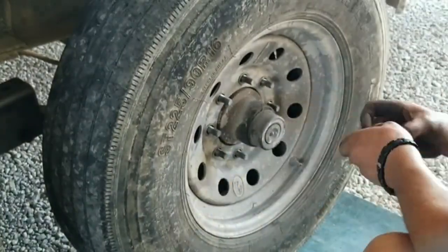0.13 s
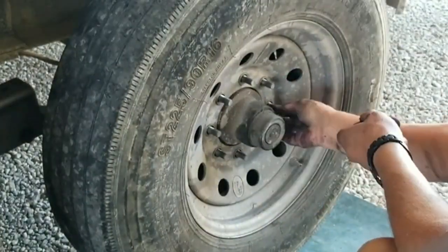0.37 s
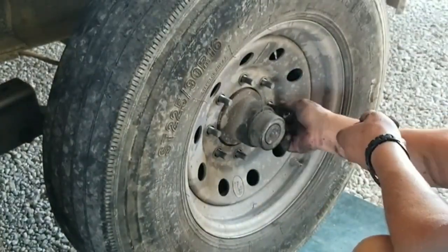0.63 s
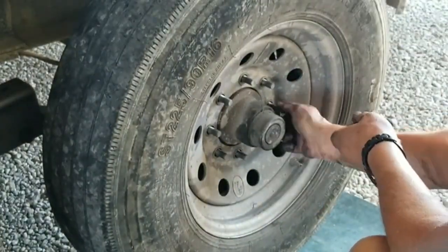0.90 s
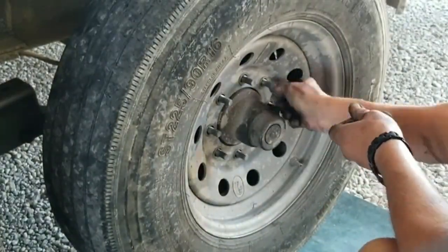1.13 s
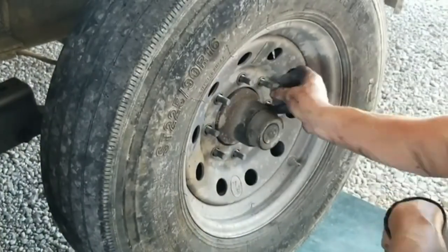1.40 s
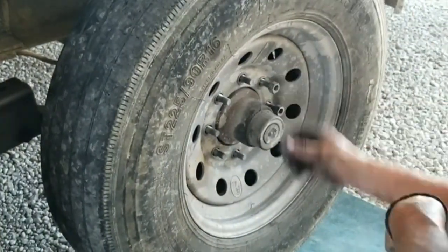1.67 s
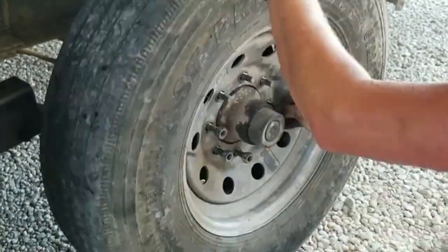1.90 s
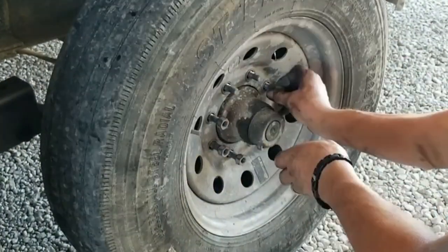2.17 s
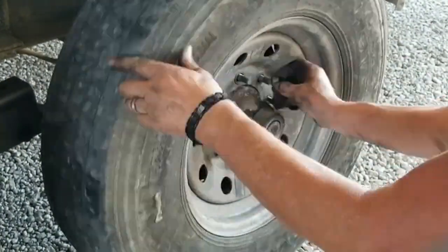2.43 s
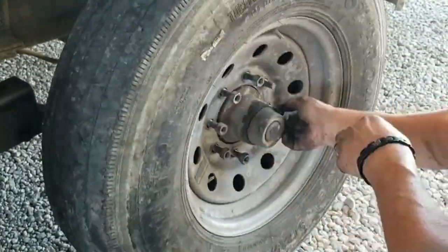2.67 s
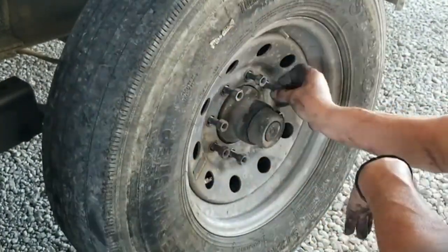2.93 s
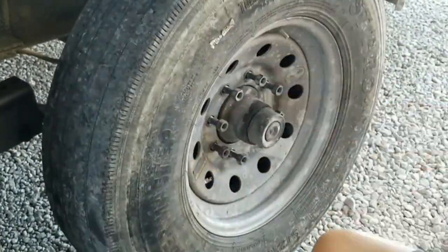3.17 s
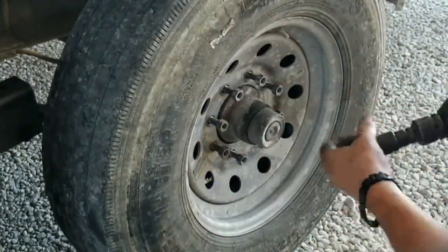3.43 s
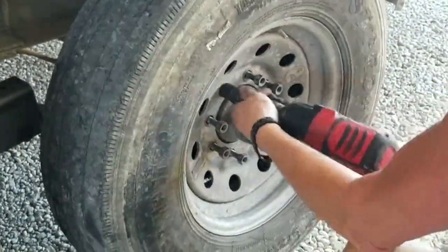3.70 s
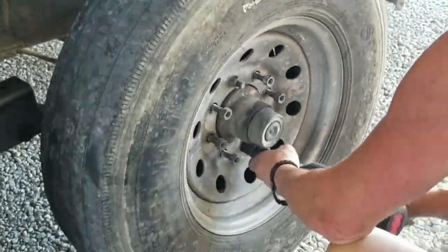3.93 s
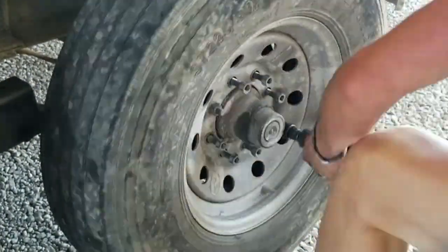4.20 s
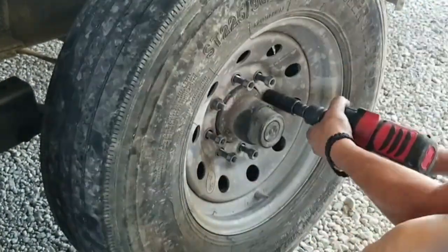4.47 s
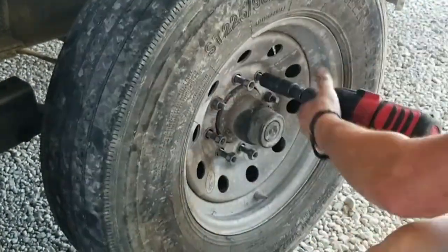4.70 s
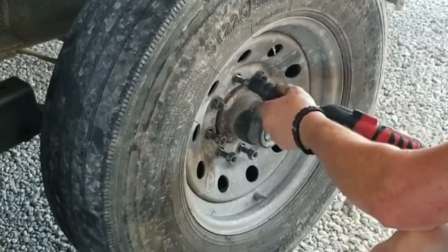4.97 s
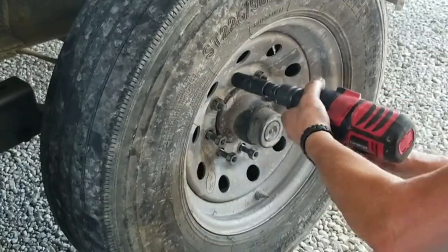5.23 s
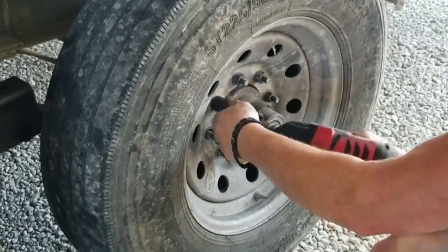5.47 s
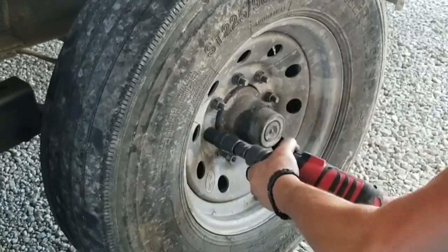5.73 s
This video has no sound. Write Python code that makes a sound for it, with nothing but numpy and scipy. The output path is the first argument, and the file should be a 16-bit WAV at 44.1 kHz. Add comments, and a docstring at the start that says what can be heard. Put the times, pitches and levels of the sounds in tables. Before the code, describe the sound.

A close stereo microphone outdoors picks up a faint, flickering machine hiss with thin, wavering hum and a low throbbing drone, strongest around 2 to 3 s. Wind flutters over the microphone as short, dull pops and soft turbulent rumble, frequent in the first second, strong near 1.45 s, and loudest from 2.8 to 3.3 s, first leaning left. At about 1.2 s two nuts knock together with a tiny bright double click; light scrapes follow near 1.5 and 1.95 s. A sharp, gritty clink on the steel wheel comes at 3.2 s. From 3.6 s an impact wrench works in short bursts: a quick rattling spin, then fast, hard, noisy hammering with high metallic ringing, around 3.7, 3.95, 4.3, 4.55, 4.85, 5.2, 5.4 and 5.8 s. Each hammering makes the hiss duck, then creep back, while wind pops grow weaker.

```python
"""From the start a machine hiss (flickering noise bands) and thin hum lines (wandering sines) run on, while
wind thumps on two microphone ports as short pops over turbulent noise. Near 1.2 s nuts knock together as ringing
modes, and nuts clink on a steel wheel rung by scrapes of noise. From 3.6 s an impact wrench works in short bursts,
its noisy blows ringing anvil, socket and body. Hiss, upper hum and calm wind sink during each hammering,
then creep back."""
import sys
import numpy as np
from scipy import signal
from scipy.fft import rfft, irfft
from scipy.io import wavfile
from scipy.ndimage import uniform_filter1d

SR = 44100
rng = np.random.default_rng(int(sys.argv[2]) if len(sys.argv) > 2 else 0)


def to_linear_factor(level_db):
    """Convert decibel levels (scalar or array-like) to linear amplitude factors."""
    exponent = np.asarray(level_db, float) / 20
    return 10 ** exponent


def bounce(signal):
    """Save signal as a 16-bit WAV file at the path given by the first command-line argument."""
    frames = np.transpose(np.atleast_2d(signal))
    limited = np.clip(frames, -1, 1)
    pcm = np.round(limited * 32767).astype(np.int16)
    wavfile.write(sys.argv[1], SR, pcm)


N = 258282
T = np.arange(N) / SR  # time in s
F = np.fft.rfftfreq(N, 1 / SR)  # bin frequency in Hz

# Throughout, pan_db is left minus right, and spectrum levels are relative.
# Hiss spectrum: frequency_hz, density_db (per Hz)
HISS_SPECTRUM = [(150, -33), (250, -19), (406, -11.5), (555, -3), (616, -3.5), (1110, -3.5), (1300, -2.5),
                 (2110, 0), (2300, -4.5), (2660, -4), (3050, -6.5), (3470, -3.5), (3790, 0.5), (4650, -5),
                 (5330, -1), (6000, -5.5), (6430, -3.5), (6880, -1.5), (7360, -7), (8200, -6),
                 (15800, -13.5)]
# Course of the hiss before any dip; hiss() plays it 5 dB higher: time_s, level_db
HISS_LEVEL = [(0.0, -51.5), (0.2, -53.5), (0.4, -52.5), (1.05, -52.5), (1.25, -51), (1.75, -50.5),
              (1.87, -49), (2.1, -49.5), (2.5, -51.5), (2.95, -51.5), (3.1, -55), (3.65, -55), (4.5, -60),
              (5.0, -58.5), (5.2, -59), (5.5, -57), (5.73, -56), (5.86, -50.5)]
# Share of hiss power common to both ports: frequency_hz, share (0 to 1)
HISS_LIKENESS = [(300, 0.08), (640, 0.64), (1400, 1), (3100, 1), (6800, 0.93), (15000, 0.51)]
PORT_LAG_S = 3.2e-5  # hiss and hum reach the right port later
DIP_DB, CREEP_DB_PER_S = -12, 38.5  # sinking during hammering, then the climb back

# Upper hum partials: pitch_hz
PARTIAL_HZ = [1199, 2187, 2399, 6664]
# One row per upper partial: level_db (over the hiss, before the shared fade), wander_hz, waver_db
PARTIALS = [(-16, 3.14, 3), (-9.5, 6, 3.5), (-16.5, 3.04, 3), (-3.5, 5.3, 1.5)]
# Shared fade of the upper partials: time_s, gain_db
PARTIAL_FADE = [(0, 0), (1.5, 2.5), (2.3, 0.5), (2.6, -6.5), (3.5, 2.5), (3.9, 2.5), (4.4, 1), (4.75, 5.5),
                (4.9, 5), (5.0, 3), (5.15, 4), (5.4, 1), (5.7, 4), (5.86, -3)]
DRONE_HZ, THROB_HZ = 547, 22
# Swelling of the drone, before throb and waver: time_s, rms_db
DRONE_LEVEL = [(0.0, -61), (0.2, -70), (0.45, -64), (0.5, -64), (0.62, -58), (0.65, -83), (0.85, -67),
               (0.9, -62), (0.94, -77), (1.13, -68), (1.17, -59.5), (1.24, -58.5), (1.34, -63),
               (1.42, -67.5), (1.52, -58.5), (1.62, -66.5), (1.75, -62), (1.89, -60.5), (1.94, -67),
               (1.97, -53), (2.07, -54.5), (2.12, -59), (2.15, -57), (2.22, -60), (2.27, -54.5),
               (2.34, -60), (2.4, -56), (2.45, -62), (2.58, -56.5), (2.74, -65.5), (2.93, -56),
               (3.05, -58.5), (3.18, -61.5), (3.35, -74), (3.38, -64), (3.66, -61), (3.71, -72.5),
               (4.46, -81.5), (5.16, -75), (5.56, -81), (5.62, -66), (5.64, -67), (5.668, -56), (5.69, -68),
               (5.77, -83), (5.86, -66)]
OCTAVE_DB, OCTAVE_FOLLOWS = -1.5, 0.57  # over the hiss; dB for each dB of drone over the hiss
# Tones that come and go: start_s, end_s, pitch_hz, level_db (peak, before waver)
PASSING_TONES = [(1.306, 1.37, 920, -53), (1.945, 2.01, 935, -49), (2.0, 2.1, 935, -50.5),
                 (2.067, 2.2, 929, -57), (5.123, 5.21, 1216, -64), (5.22, 5.277, 1416, -61),
                 (5.675, 5.775, 1088, -57)]

# Eddy spectrum: frequency_hz, density_db (per Hz)
EDDY_SPECTRUM = [(100, -41), (200, -27.5), (400, -3), (750, -3.5), (1300, -8), (2000, -9), (5000, -29.5)]
# Rumble spectrum: frequency_hz, density_db (per Hz)
RUMBLE_SPECTRUM = [(20, 1.5), (60, -3), (150, -1), (300, -2), (600, -74)]
# Depth of the wind: time_s, rumble_db (over the eddies, before their flicker)
WIND_DEPTH = [(0.0, -9), (0.6, -11.5), (1.5, -6.5), (2.2, -6.5), (2.7, -13), (2.85, -24), (3.1, -30),
              (3.22, -5), (3.34, -5.5), (3.5, -13.5), (4.1, -11.5), (5.86, -15)]
# Longer stirrings of wind: centre_s, level_db, half_length_s (power down to 1/e), pan_db
STIRS = [(0.024, -46.5, 0.039, 0), (0.347, -53.5, 0.085, 2.5), (0.664, -53.5, 0.01, 6),
         (0.777, -57, 0.053, -4), (1.015, -60.5, 0.038, -4), (1.696, -60, 0.011, 9), (1.847, -59, 0.075, 9),
         (2.512, -70, .07, -5), (2.724, -56, 0.21, -3), (3.045, -50, 0.063, 0.5), (3.84, -63, 0.058, -8),
         (4.214, -65.5, 0.13, -5.5), (4.503, -74, 0.24, -11), (5.076, -62, 0.037, -1),
         (5.585, -61, 0.022, -7), (5.797, -60, 0.079, -2)]
# Wind thumps: centre_s, level_db (pop peak is 3.5 dB lower), pitch_hz, pan_db, length_ms (at least 0.7 is used)
THUMPS = [(0.017, -35, 1020, -3, 1.3), (0.024, -38, 940, 1, 2.1), (0.032, -30, 866, -17, 1.4),
          (0.039, -32, 830, -14, 2.1), (0.055, -39, 885, 15, 3.5), (0.188, -31, 910, 2, 1.55),
          (0.278, -34, 676, 3, 1.8), (0.289, -40, 816, -1, 1.8), (0.315, -35, 1350, -4, 1.4),
          (0.348, -40, 880, 2, 1.8), (0.352, -35.5, 726, 5, 1.7), (0.369, -36, 690, -6, 2),
          (0.374, -33, 680, 1, 0.62), (0.383, -34, 790, 0, 1.1), (0.39, -30.5, 1080, -9, 0.92),
          (0.403, -32, 925, -1, 1.7), (0.466, -39, 840, -1, 2.2), (0.623, -44, 1040, 5, 0.92),
          (0.653, -36, 1030, -3, 0.91), (0.658, -34, 1080, 3, 0.67), (0.68, -38, 750, 5, 1.4),
          (0.747, -35.5, 770, -4, 1.3), (0.763, -39, 1030, -5, 1.1), (0.769, -35, 660, 2, 2),
          (0.78, -34.5, 940, 0, 1.2), (0.798, -43, 940, 1, 3), (0.818, -37.5, 786, 5, 1.7),
          (0.955, -39, 940, 1, 2), (0.961, -35, 533, -1, 3.8), (1.014, -38, 740, -3, 1.9),
          (1.035, -33, 860, -3, 1.9), (1.043, -34, 720, 1, 1.6), (1.329, -42, 1000, 1, 2.3),
          (1.442, -28.5, 850, -3, 1.6), (1.447, -25.5, 695, 1, 1.06), (1.455, -36, 1020, 3, 0.9),
          (1.473, -38, 1560, 3, 3.7), (1.673, -40, 1040, 4, 1.8), (1.677, -30.5, 820, 1, 1.2),
          (1.685, -34, 1140, 0, 0.56), (1.766, -32.5, 1090, 6, 1.1), (1.793, -32, 910, 1, 1.5),
          (1.806, -36, 1000, 12, 1.3), (1.811, -29.5, 950, 9, 2.2), (1.98, -48, 870, -1, 1.1),
          (2.029, -43, 1100, -9, 1.6), (2.055, -37, 1250, 1, 2), (2.185, -32, 920, 0, 0.95),
          (2.535, -33, 825, -2, 1.2), (2.54, -38, 940, -4, 0.8), (2.631, -46, 930, 4, 0.99),
          (2.642, -29, 755, -3, 1.5), (2.655, -40, 960, 2, 1.1), (2.801, -33, 640, 16, 1.3),
          (2.815, -42, 840, 13, 2.3), (2.83, -24.5, 1030, 28, 0.5), (2.834, -23.5, 830, 30, 1.3),
          (2.889, -32, 710, 14, 2), (2.927, -28.5, 790, 23, 1.3), (2.933, -31, 1040, 14, 1.3),
          (3.0, -31, 825, 21, 3.3), (3.008, -33, 830, 15, 2.1), (3.012, -36, 840, 14, 1.2),
          (3.03, -24, 1120, 24, 1.07), (3.046, -33, 930, 15, 1.3), (3.136, -26.5, 760, 9, 1.3),
          (3.141, -28, 755, -3.5, 0.48), (3.146, -21, 745, -11.5, 2.2), (3.152, -27, 1160, -2, 0.96),
          (3.249, -20.5, 730, -11, 1), (3.256, -23, 634, -9, 3.5), (3.262, -26, 1080, -7, 0.88),
          (3.271, -34, 840, 0, 1.2), (3.288, -38, 1000, -6, 2.1), (3.303, -33, 790, -9, 1.6),
          (3.308, -34, 740, 8, 1.4), (3.312, -33, 755, -12, 2.3), (3.317, -30, 850, -3.5, 1.3),
          (3.323, -36, 800, -6, 1.3), (3.557, -42, 1190, 1, 1.2), (3.665, -38.5, 790, -6, 1.1),
          (3.69, -44, 1170, 4, 1.4), (3.708, -39, 1130, -1, 1.2), (3.852, -35, 890, -6, 0.75),
          (3.857, -48, 890, -2, 0.9), (3.866, -41.5, 780, 6, 0.87), (3.923, -48, 1230, 2, 2.4),
          (4.005, -57, 1130, 3, 1.5), (4.011, -58, 830, 3, 1.7), (4.03, -48, 1120, 3, 1.5),
          (4.116, -44.5, 760, -4, 2), (4.154, -51, 860, -3, 1.5), (4.181, -53, 910, 0, 0.97),
          (4.237, -42, 920, -10, 1), (4.246, -46, 810, -3, 1.1), (4.264, -48, 770, -1, 2.1),
          (4.313, -51, 1120, 3, 1.0), (4.329, -49, 970, 3, 1.0), (4.38, -53, 785, -7, 2),
          (4.423, -51, 610, -9, 1.6), (4.464, -44, 880, -13, 0.81), (4.476, -43.5, 1200, -4, 0.89),
          (4.495, -50, 1120, -8, 2.1), (4.501, -45, 910, 1, 0.67), (4.511, -44, 730, -3, 1.2),
          (4.526, -50, 800, -4, 1.4), (4.541, -44, 615, -6, 2.6), (4.548, -46, 850, 3, 1.4),
          (4.601, -56, 890, 1, 1.8), (4.801, -46, 940, -14, 1.3), (4.811, -46, 1150, -1, 1.5),
          (4.819, -54, 973, -1, 1.6), (4.827, -39.5, 600, -1, 1.6), (4.877, -46, 1120, -2, 0.82),
          (5.033, -41.5, 825, -2, 1.5), (5.04, -44, 1090, -16, 1.8), (5.052, -43.5, 825, -4, 2.0),
          (5.256, -52, 1400, -5, 6.0), (5.291, -42, 760, 3, 0.73), (5.33, -44, 1130, -3, 0.72),
          (5.387, -46, 780, -7, 0.71), (5.399, -52, 1190, -4, 1.0), (5.408, -50, 1150, -5, 1.0),
          (5.419, -45, 930, 2, 1.2), (5.428, -40, 1070, 1, 0.62), (5.433, -51, 1040, 1, 0.9),
          (5.447, -43.5, 1110, -4, 1.1), (5.452, -48, 1050, 0, 0.75), (5.575, -43, 1000, -3, 0.61),
          (5.678, -57, 1060, -1, 1.4), (5.711, -54, 1090, -3, 1.2), (5.716, -44, 1060, -6, 1.7),
          (5.757, -41, 1130, -7, 1), (5.762, -42, 1190, -9, 1.6), (5.821, -45, 1030, -4, 1.6)]
CALM_DB, GUST_PAN = -73, 0.76  # wind between thumps; dB of eddy pan for each dB of gust pan
GUST_DB, GUST_TOP_DB = -23, -50  # relative to a thump's level_db; loudest a gust gets
GATHER_S, DIE_S = 0.013, 0.01  # time constants of a gust before and after its thump
THUMP_SKEW_RAD = 1.293  # spread of the phase between the ports
SHED_DB, SHED_SPREAD_S, SHED_OCTAVES = -9.5, 0.006, 0.73  # smaller pops around each thump

# Clinks, mostly nuts against the wheel; the 1.215 s row trails the knock of the nuts in the hand: centre_s,
# peak_db (before panning), low_hz, high_hz, length_ms
CLINKS = [(1.215, -35, 3300, 5900, 16), (1.471, -37, 1410, 2600, 5), (1.95, -39.5, 4000, 13000, 3.3),
          (3.198, -39, 3500, 14000, 7), (3.208, -29, 3300, 7600, 7.3), (3.209, -34, 7600, 14400, 12),
          (3.216, -28, 2800, 7400, 7.2), (3.215, -32, 1400, 2880, 8), (3.56, -41, 7000, 14900, 3.5),
          (3.797, -50, 7000, 12000, 1.13), (4.434, -39.5, 4500, 15000, 1.4), (5.35, -48, 4500, 10900, 5.1)]
# Wheel modes: frequency_hz, level_db, t60_s
WHEEL_MODES = [(2060, 9, 0.022), (3480, -11.5, 0.04), (4390, 2, 0.018), (4810, 2, 0.015)]
# Nut modes: frequency_hz, level_db, t60_s
NUT_MODES = [(3560, 0, .014), (3700, -1, .02), (4180, -4, .016), (4700, -3, .008), (5300, -2, .006),
             (5900, -6, .005)]
# Two nuts knocking together in the hand: start_s, peak_db (before panning)
NUT_TICKS = [(1.2088, -28), (1.2094, -20), (1.2155, -36), (1.2192, -33)]
CLINK_PAN_DB = -4

# Anvil modes: frequency_hz, level_db, t60_s
ANVIL_MODES = [(6312, -3, .025), (6444, -6, .025), (6660, 0, .03), (6765, -6, .025), (7020, -6, .02),
               (7130, -10, .02)]
# Socket modes: frequency_hz, level_db (before the focus weighting), t60_s
SOCKET_MODES = [(9500, -3, .03), (9621, -2, .035), (9700, 0, .035), (9760, -2, .035), (9893, -2, .03)]
# Wrench body modes: frequency_hz, level_db, t60_s
BODY_MODES = [(3600, -15, 0.0053), (4460, 5, 0.015), (5380, 11, 0.01)]
# Socket modes that ring most, nut by nut: time_s, centre_hz
SOCKET_FOCUS = [(3.6, 9484), (4.0, 9630), (4.3, 9726), (4.6, 9810), (4.85, 9794), (5.25, 9800), (5.8, 9690)]
FOCUS_WIDTH_HZ = 66
# Clatter spectrum: frequency_hz, density_db (per Hz)
CLATTER_SPECTRUM = [(300, -29), (900, -7), (2000, 2), (4000, 10.5), (8000, 15), (11000, 12), (13500, 13.5),
                    (15300, 17.5), (16000, -22)]
# Running a nut down: start_s, end_s, clatter_start_db, clatter_end_db, socket_db (over the clatter)
RUNDOWNS = [(3.598, 3.695, -51, -54.5, -3), (3.849, 3.926, -55, -60, -11), (4.429, 4.511, -59, -61, -8),
            (4.728, 4.799, -65, -55, -0.5), (5.107, 5.169, -53.5, -54.5, -22),
            (5.67, 5.742, -53.5, -48, -17)]
RUN_ANVIL_DB, RUN_BODY_DB, RUN_PAN_DB = -29, -9, -2  # rings over the clatter; pan
# Hammering a nut tight, before surges: start_s, end_s, clatter_db, anvil_db, socket_db (rings over the clatter)
HAMMERING = [(3.694, 3.703, -49.5, -3, -3.5), (3.943, 4.037, -48.5, 3.5, 0), (4.264, 4.327, -48.5, -6, -2),
             (4.524, 4.618, -52, -9, 1.5), (4.816, 4.88, -49.5, -7, -2), (5.177, 5.276, -55, -8.5, -10.5),
             (5.383, 5.438, -47.5, -5, -4.5), (5.756, 5.849, -47.5, -9, -11)]
HAMMER_BODY_DB, BODY_FOLLOWS = -6.5, 0.98  # over the clatter; dB of body for each dB of socket_db
HAMMER_PAN_DB, PAN_DB_PER_S = -2, -26
ATTACK_DB_PER_S, RELEASE_DB_PER_S = 2500, 1406
# Harder spells of blows: centre_s, clatter_gain_db, half_length_s (gain in dB down to 1/e)
SURGES = [(3.71, 12.5, 0.0072), (3.98, 2.5, 0.012), (4.021, 3.5, 0.03), (4.267, 3, 0.0063),
          (4.337, 10, 0.0064), (4.537, 0, 0.008), (4.58, 4, 0.013), (4.608, 2.5, 0.011),
          (4.845, 3.5, 0.008), (4.864, 3, 0.006), (4.878, 2, 0.005), (5.251, 10.5, 0.056),
          (5.42, 7.5, 0.01), (5.793, 4.5, 0.015), (5.824, 7.5, 0.027)]
RING_SURGE = 1.54  # dB gained by the rings for each dB of clatter
# Hardest single blows: time_s, level_db (over an ordinary blow)
HARD_BLOWS = [(3.698, 2), (3.705, 9), (3.944, 1), (3.964, -2), (3.966, 10.5), (3.973, -3), (3.973, 0),
              (3.986, 3), (4.007, 0), (4.028, -6), (4.032, -6), (4.266, 3), (4.268, -7), (4.321, 6),
              (4.526, -3), (4.533, -1), (4.543, 0), (4.575, 2), (4.611, 6), (5.249, 2), (5.253, 4),
              (5.259, 4), (5.406, 9), (5.4184, 4.5), (5.4235, -3), (5.4256, 5), (5.776, 4), (5.8, 2),
              (5.808, 4), (5.8265, 2), (5.8334, 8), (5.84, 7)]
MIC_HISS_DB = -71.5


def unit(x):
    """Normalization: scale to rms 1."""
    return x / np.sqrt(np.mean(x ** 2))


def course(points):
    """Linear interpolation of a (time, value) table at every sample."""
    return np.interp(T, *np.transpose(points))


def over_hz(points):
    """Interpolation of a (frequency, value) table at every bin, straight on a log axis."""
    hz, value = np.transpose(points)
    return np.interp(np.log(F + 1), np.log(hz), value)


def colour(x, points):
    """Spectral shaping: weight the bins of x by a table in dB, then scale to rms 1."""
    return unit(irfft(rfft(x) * to_linear_factor(over_hz(points)), N))


def walk(rate):
    """Slow random modulation: levels held 1 / rate s, smoothed twice, spread 1."""
    k = int(SR / rate)
    held = np.repeat(rng.standard_normal(N // k + 1), k)
    return unit(uniform_filter1d(uniform_filter1d(held, k), k)[:N])


def ring(x, modes):
    """Modal resonance: x excites a sum of exponentially decaying sines."""
    out = 0
    for hz, db, t60 in modes:
        pole = np.exp(2j * np.pi * hz / SR - np.log(1000) / (t60 * SR))
        out = out + to_linear_factor(db) * signal.lfilter([1], [1, -pole], x).imag
    return out


def pan(x, db):
    """Interaural-style level difference: left minus right in dB, split evenly over the ports."""
    return x * to_linear_factor(np.array([db, -db]) / 2).reshape(2, -1)


def add(out, s, sound):
    """Superposition: mix a short stereo sound in at time s."""
    i = max(int(s * SR), 0)
    out[:, i:i + sound.shape[1]] += sound[:, :N - i]


def dip():
    """Gain reduction in dB: a ramp down through each hammering, a slow climb after it; the deepest dip holds."""
    dips = []
    for start, end, *_ in HAMMERING:
        sinking = DIP_DB * np.clip((T - start) / (end - start), 0, 1)
        creeping = np.minimum(DIP_DB + CREEP_DB_PER_S * (T - end), 0)
        dips.append(np.where(T < end, sinking, creeping))
    return np.min(dips, axis=0)


def hiss(level_db):
    """Partial coherence with arrival delay: two ports share some noise, and its half-octaves flicker separately."""
    common, left, right = (rfft(rng.standard_normal(N)) for _ in range(3))
    share = np.clip(over_hz(HISS_LIKENESS), 0, 1)
    delay = np.exp(-2j * np.pi * F * PORT_LAG_S)
    shared = np.sqrt(share) * common * np.array([delay ** 0, delay])
    spectrum = (shared + np.sqrt(1 - share) * np.array([left, right])) * to_linear_factor(over_hz(HISS_SPECTRUM))
    edges_hz = 125 * 2 ** np.arange(0, 7.5, .5)
    out = 0
    for low, high in zip(edges_hz, edges_hz[1:]):
        flicker = to_linear_factor(0.042 * walk(3.7) + walk(27.87))
        out = out + flicker * irfft(spectrum * ((F >= low) & (F < high)), N)
    return unit(out) * to_linear_factor(level_db + 5) * to_linear_factor(0.6 * walk(40))


def line(hz, wander_hz, waver_db):
    """Frequency and amplitude modulation of a sine, with a phase lag at the right port."""
    phase = 2 * np.pi * np.cumsum(hz + wander_hz * walk(30)) / SR
    lag = np.array([[0], [2 * np.pi * hz * PORT_LAG_S]])
    return to_linear_factor(waver_db * walk(32.09)) * np.sin(phase - lag)


def hum(drone_db, hiss_db):
    """Additive synthesis: a throbbing drone, its octave, partials riding with the hiss and passing tones.
    drone_db is over the hiss."""
    throb = 1 + 0.7 * np.sin(2 * np.pi * np.cumsum(THROB_HZ + 8 * walk(9.6)) / SR)
    drone = np.sqrt(2) * to_linear_factor(drone_db) * throb * line(DRONE_HZ, 3, 1)
    octave_db = OCTAVE_DB + OCTAVE_FOLLOWS * drone_db + 1.5 * walk(30)
    octave = to_linear_factor(octave_db) * line(2 * DRONE_HZ, 6, 2)
    upper = 0
    for hz, (db, wander_hz, waver_db) in zip(PARTIAL_HZ, PARTIALS):
        upper = upper + to_linear_factor(db) * line(hz, wander_hz, waver_db)
    upper = upper * to_linear_factor(course(PARTIAL_FADE))
    passing = 0
    for start, end, hz, db in PASSING_TONES:
        fade = np.clip(np.minimum(T - start, end - T) / 0.025, 0, 1)
        passing = passing + fade * to_linear_factor(db) * to_linear_factor(3 * walk(70)) * line(hz, 16, 2)
    return to_linear_factor(hiss_db) * (drone + octave + upper) + passing


def breeze(dip_db):
    """Turbulent pressure, independent at each port: quick eddies over a deeper rumble, with gusts adding in power."""
    power = to_linear_factor(2 * (CALM_DB + dip_db + 4 * np.clip(walk(14), -2, 1.5)))
    lean = 0  # pan weighted by power
    for s, db, _, pan_db, _ in THUMPS:
        shape = np.exp(-2 * np.where(T < s, (s - T) / GATHER_S, (T - s) / DIE_S))
        gust = to_linear_factor(2 * min(db + GUST_DB, GUST_TOP_DB)) * shape
        power, lean = power + gust, lean + pan_db * gust
    for s, db, half, pan_db in STIRS:
        gust = to_linear_factor(2 * db) * np.exp(-((T - s) / half) ** 2)
        power, lean = power + gust, lean + pan_db * gust
    pan_db, deep_db = GUST_PAN * lean / power, course(WIND_DEPTH)
    eddies, deep = [], []
    for _ in range(2):
        flicker_db = np.minimum(6.2 * walk(60) + 5.9 * walk(170), 9.5)
        eddies.append(colour(rng.standard_normal(N), EDDY_SPECTRUM) * to_linear_factor(flicker_db))
    for _ in range(2):
        rumble_db = deep_db + walk(8) + 0.48 * walk(40)
        deep.append(colour(rng.standard_normal(N), RUMBLE_SPECTRUM) * to_linear_factor(rumble_db))
    return np.sqrt(power) * (pan(np.array(eddies), pan_db) + pan(np.array(deep), 0.13 * pan_db))


def burst(t, hz, ms, phase):
    """Gaussian tone burst: a sine under a bell whose width at half height is ms, at least 0.7."""
    return np.cos(2 * np.pi * hz * t + phase) * np.exp(-4 * np.log(2) * (1000 * t / max(ms, .7)) ** 2)


def thumps():
    """Vortex bursting: each eddy is a short pop, out of step between ports, shedding smaller pops around it."""
    out, t = np.zeros((2, N)), (np.arange(1024) - 512) / SR
    chances = np.clip(rng.standard_normal((len(THUMPS), 34)), -2, 2)
    for (s, db, hz, pan_db, ms), chance in zip(THUMPS, chances):
        skew = THUMP_SKEW_RAD / 2 * chance[1] * np.array([[1], [-1]])
        pop = pan(burst(t, hz, ms, np.pi * chance[0] + skew), pan_db)
        # four shed pops on each port
        when, pitch, size, turn = chance[2:].reshape(4, 4, 2, 1)
        late = np.clip(SHED_SPREAD_S * (when + .5), -.009, .009)
        shed_hz = hz * 2 ** (SHED_OCTAVES * (pitch + .5))
        shed = to_linear_factor(SHED_DB + 3.4 * size) * burst(t - late, shed_hz, 0.98, np.pi * turn)
        peak = np.abs(signal.hilbert(pop.mean(axis=0))).max()
        add(out, s + t[0], (pop + pan(shed.sum(axis=0), pan_db)) / peak * to_linear_factor(db - 3.5))
    return signal.lfilter(*signal.butter(2, 170, "high", fs=SR), out)


def nut_ticks():
    """Impulse excitation: a hard, brief contact rings the modes of the nuts."""
    out, contact = np.zeros((2, N)), np.pad(np.hanning(5), (0, 1500))
    band = signal.butter(3, [3100, 6200], "band", fs=SR)
    tick = signal.lfilter(*band, ring(contact, NUT_MODES))
    for s, db in NUT_TICKS:
        add(out, s, pan(tick / np.abs(tick).max() * to_linear_factor(db), CLINK_PAN_DB))
    return out


def swell(t, ms):
    """Contact envelope: a rounded rise and fall."""
    x = t / (max(ms, .3) / 1000)
    return x ** 1.04 * np.exp(-x ** 2)


def clinks():
    """Friction excitation: a short scrape of band-limited noise rings the wheel."""
    out, t = np.zeros((2, N)), np.arange(2048) / SR
    for s, db, low_hz, high_hz, ms in CLINKS:
        scrape = rng.standard_normal(len(t)) * swell(t, ms)
        band = signal.butter(3, [low_hz, high_hz], "band", fs=SR)
        sound = signal.lfilter(*band, scrape + 0.026 * ring(scrape, WHEEL_MODES))
        add(out, s - ms / 2000, pan(sound / np.abs(sound).max() * to_linear_factor(db), CLINK_PAN_DB))
    return out


def spell(start, end):
    """Exponential attack and release around one trigger pull."""
    return to_linear_factor(-ATTACK_DB_PER_S * np.maximum(start - T, 0) - RELEASE_DB_PER_S * np.maximum(T - end, 0))


def effort():
    """Load dependence: gains of clatter, anvil, socket and body, and the lean to the right as a nut tightens."""
    levels, pan_db = 0, np.full(N, float(RUN_PAN_DB))
    for start, end, from_db, to_db, socket_db in RUNDOWNS:
        over = to_linear_factor(np.array([[0], [RUN_ANVIL_DB], [socket_db], [RUN_BODY_DB]]))
        clatter = to_linear_factor(np.interp(T, [start, end], [from_db, to_db]))
        levels = levels + over * clatter * spell(start, end)
    surge_db = sum(db * np.exp(-((T - s) / half) ** 2) for s, db, half in SURGES)
    harder = to_linear_factor(surge_db * np.array([[1], [RING_SURGE], [RING_SURGE], [RING_SURGE]]))
    for start, end, db, anvil_db, socket_db in HAMMERING:
        body_db = HAMMER_BODY_DB + BODY_FOLLOWS * socket_db
        over = to_linear_factor(db + np.array([[0], [anvil_db], [socket_db], [body_db]]))
        levels = levels + over * harder * spell(start, end)
        on = (T >= start) & (T < end + .04)
        pan_db[on] = HAMMER_PAN_DB + PAN_DB_PER_S * (T[on] - start)
    return levels, pan_db


def blow_gate(rate_hz=450.0, scatter_db=4.0, puff_s=0.00077, steady=0.52):
    """Repeated impact: unevenly timed blows, each a decaying puff over the motor's steady rattle."""
    chance = np.clip(rng.standard_normal((4000, 2)), -2, 2)
    at = (np.cumsum(np.exp(0.16 * chance[:, 0])) * SR / rate_hz).astype(int)
    blows = np.zeros(N)
    blows[at[at < N]] = to_linear_factor(scatter_db * chance[at < N, 1])
    for s, db in HARD_BLOWS:
        blows[int(s * SR)] += to_linear_factor(db)
    rounded = np.convolve(blows, np.hanning(35) / 12, "same")
    return steady + signal.lfilter([1], [1, -np.exp(-1 / (puff_s * SR))], rounded)


def wrench():
    """Forced vibration: gated noise from the hammer blows rings anvil, socket and body amid clatter."""
    (clatter, *ring_gains), pan_db = effort()
    gate = blow_gate()
    drive = [gate * rng.standard_normal(N) for _ in range(5)]
    focus_hz, socket = course(SOCKET_FOCUS), 0
    for mode in SOCKET_MODES:
        weight = np.exp(-((mode[0] - focus_hz) / FOCUS_WIDTH_HZ) ** 2)
        socket = socket + weight * ring(drive[1], [mode])
    resonators = ring(drive[0], ANVIL_MODES), socket, ring(drive[2], BODY_MODES)
    rings = sum(gain * unit(sound) for gain, sound in zip(ring_gains, resonators))
    common = rings + clatter * colour(drive[3], CLATTER_SPECTRUM)
    # echoes off wheel and ground differ between the ports
    apart = clatter * to_linear_factor(-6.5) * colour(drive[4], CLATTER_SPECTRUM) + to_linear_factor(-3) * np.roll(rings, 31)
    return pan(common + apart * np.array([[1], [-1]]), pan_db)


def scene():
    """Linear superposition of all sources at the two ports."""
    dip_db = dip()
    hiss_db = course(HISS_LEVEL) + dip_db
    background = hiss(hiss_db) + hum(course(DRONE_LEVEL) - hiss_db, hiss_db)
    wind = breeze(dip_db) + thumps()
    return background + wind + nut_ticks() + clinks() + wrench()


def top_cut(x):
    """Nothing passes above the cut-off."""
    return signal.sosfilt(signal.butter(12, 16830, fs=SR, output="sos"), x)


def record(dry):
    """Self-noise: the microphone adds a faint, independent white hiss at each port."""
    mix = dry + to_linear_factor(MIC_HISS_DB) * rng.standard_normal(dry.shape)
    return top_cut(mix)


dry = scene()
out = record(dry)
bounce(out)
```